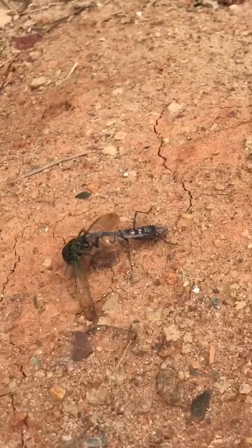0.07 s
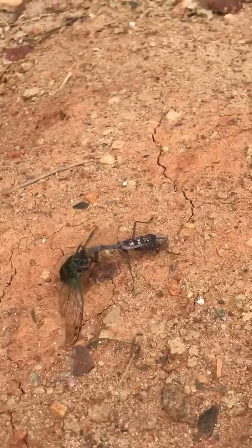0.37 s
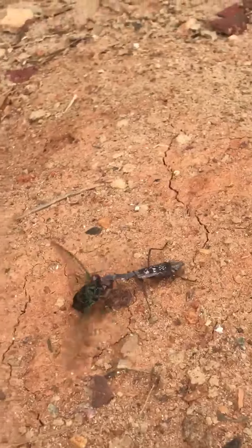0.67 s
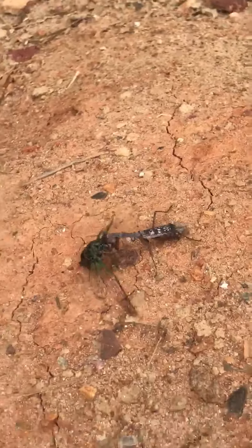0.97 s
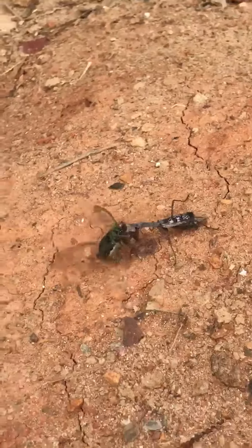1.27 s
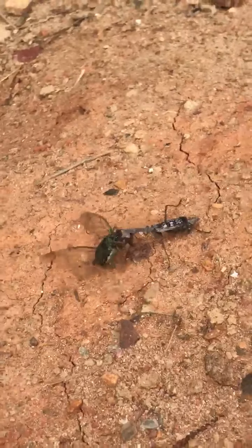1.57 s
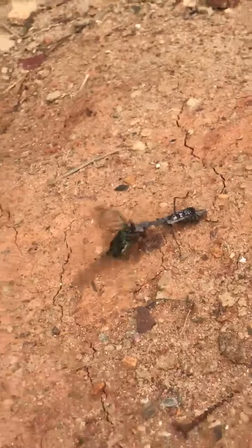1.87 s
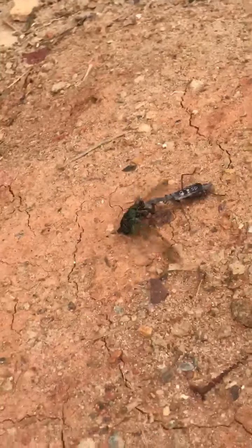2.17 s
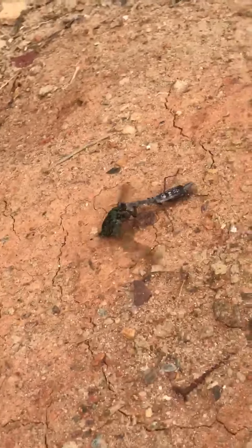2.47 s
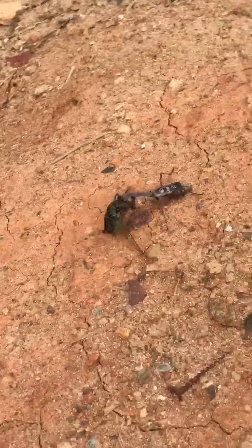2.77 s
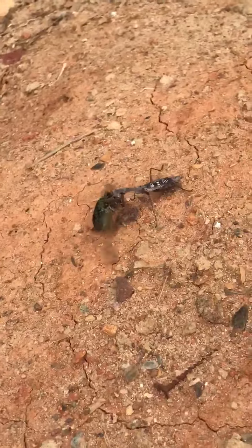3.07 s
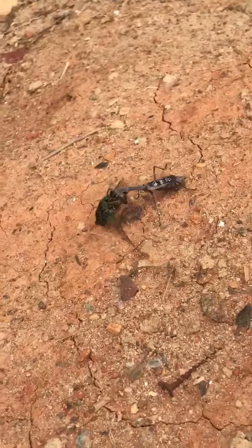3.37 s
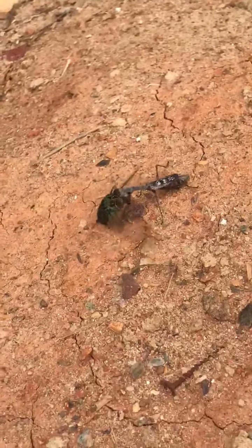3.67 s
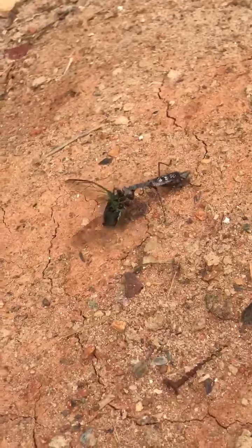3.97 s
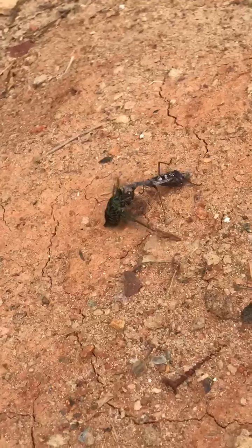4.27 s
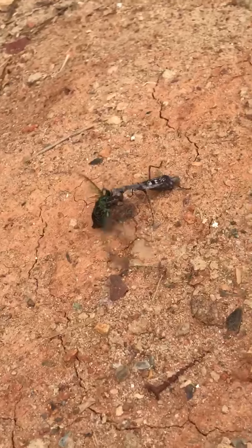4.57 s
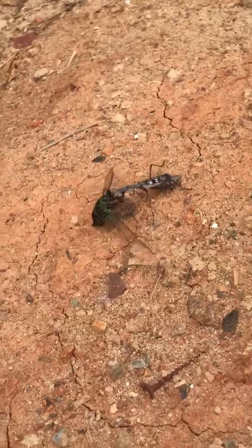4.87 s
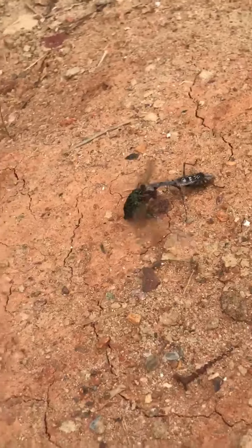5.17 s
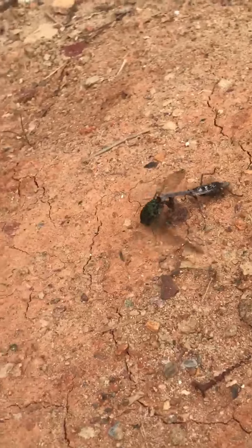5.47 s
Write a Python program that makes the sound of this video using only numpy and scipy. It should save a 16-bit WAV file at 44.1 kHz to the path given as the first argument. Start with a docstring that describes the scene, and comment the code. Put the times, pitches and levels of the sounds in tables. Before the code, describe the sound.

Outdoors, close to the ground, stiff insect wings rattle against sandy dirt in quick stop-and-start bursts from beginning to end. Low gusts hit the microphone and get stronger later. Behind this, a faint high insect chorus carries on steadily, and a distant hum fades after a second. Two far bird whistles and a sharp tap come early, and one more whistle near the end.

```python
"""Outdoors, a far insect chorus and a high pulsing trill sound throughout; a distant hum lasts a second.
From the start air buffets the microphone. Between two dry taps a cicada, pinned on dry soil, begins to
beat its wings in fits of about thirty strokes a second: each stroke crackles on the grit and rebounds,
and the wings drag in between. Then two far bird whistles and a louder tap pass. The fits go on while
the buffeting grows heavier, and a last bird whistles near the end."""
import sys
import numpy as np
from scipy import signal
from scipy.fft import rfft, irfft, next_fast_len
from scipy.io import wavfile
from scipy.ndimage import uniform_filter1d, map_coordinates

SR = 44100
rng = np.random.default_rng(int(sys.argv[2]) if len(sys.argv) > 2 else 0)


def digitize_waveform(pressure):
    """Quantize a signal to 16-bit integers and store it at the path in sys.argv[1].

    Rows of a 2-D input are taken as channels; values are limited to [-1, 1].
    """
    field = np.atleast_2d(pressure).T
    bounded = np.clip(field, -1, 1)
    quanta = np.round(bounded * 32767).astype(np.int16)
    wavfile.write(sys.argv[1], SR, quanta)


N = 248283
TIME = np.arange(N) / SR
CUTOFF_HZ = 15900


def from_db(db):
    """Decibels to gain."""
    return 10 ** (np.asarray(db) / 20)


def rms_one(x):
    """Scale to unit power."""
    return x / np.sqrt(np.mean(x ** 2) + 1e-20)


def colour(x, spectrum):
    """Minimum-phase EQ that keeps the power of white noise, so the curve sets only the tone."""
    size = 2 * next_fast_len(N // 2 + SR // 8)
    hz, db = np.transpose(spectrum)
    grid = np.maximum(np.arange(size // 2 + 1) * SR / size, 1)
    curve = from_db(np.interp(np.log(grid), np.log(hz), db))
    gain = rms_one(curve / np.sqrt(1 + (grid / CUTOFF_HZ) ** 40))
    cepstrum = irfft(np.log(gain))
    fold = 1 + np.sign(size // 2 - np.arange(size))   # folding the cepstrum makes the filter causal
    fold[0] = 1
    return irfft(rfft(x, size) * np.exp(rfft(cepstrum * fold)))[:N]


def drift(rate):
    """Smooth random modulation at unit power that changes `rate` times a second."""
    knots = rng.standard_normal(4096)
    return rms_one(map_coordinates(knots, [TIME * rate], order=2, mode="wrap"))


def narrow_noise(hz, width_hz):
    """Noise twice through one resonance, at unit power."""
    r = np.exp(-np.pi * width_hz / SR)
    section = [1 - r, 0, r - 1, 1, -2 * r * np.cos(2 * np.pi * hz / SR), r * r]
    return rms_one(signal.sosfilt([section, section], rng.standard_normal(N)))


def grit(per_s, spread_db):
    """Tiny collisions of uneven size at random moments, at unit power."""
    sizes = from_db(spread_db * np.minimum(rng.exponential(1, N), 3.5)) * rng.choice([-1, 1], N)
    return rms_one(sizes * (rng.random(N) < per_s / SR))


def contacts(times, levels_db, rise_s, fall_s):
    """Envelope of contacts with a fast attack and an exponential decay."""
    power = np.zeros(N)
    for s, db, rise, fall in np.broadcast(times, levels_db, rise_s, fall_s):
        near = slice(max(int(s * SR) - SR // 50, 0), int(s * SR) + SR // 12)
        t = TIME[near] - s
        power[near] += (from_db(db) * np.exp(np.where(t < 0, -(t / rise) ** 2, -t / fall))) ** 2
    return np.sqrt(power)


def far_tone(rows, waver_db, scatter_hz):
    """A distant tone, blurred and made to waver by the paths it takes."""
    times, *columns = np.transpose(rows)
    hz, level_db = [np.interp(TIME, times, column) for column in columns]
    gate = uniform_filter1d(1.0 * ((TIME >= times[0]) & (TIME <= times[-1])), size=SR // 80)
    phase = 2 * np.pi * np.cumsum(hz + scatter_hz * drift(150)) / SR
    return np.sqrt(2) * gate * from_db(level_db + waver_db * drift(40)) * np.sin(phase)


# EQ of the outdoor air bed: f/Hz, level/dB
AIR_EQ = [(25, -18), (50, 11), (100, 6.5), (250, -3), (500, -3.5), (750, -7), (980, -2.5), (1400, -13.5),
          (2200, -16), (3800, -17), (4900, -25.5), (9500, -17.5), (15500, -20.5)]
def still_air():
    """A quiet, dark bed of steady noise."""
    return from_db(-66.0) * colour(rng.standard_normal(N), AIR_EQ)


# Bands of the insect bed: f/Hz, width/Hz, level/dB
CHORUS_BANDS = [(5740, 180, -78), (6120, 600, -74.5), (6960, 320, -71), (7345, 160, -69.5),
                (9430, 370, -81)]
def insect_chorus():
    """Far insects blend into narrow bands of hiss that shimmer together."""
    bands = sum(from_db(db) * narrow_noise(hz, width) for hz, width, db in CHORUS_BANDS)
    return bands * from_db(2.0 * drift(25))


# EQ of the trill, all top end: f/Hz, level/dB
TRILL_EQ = [(7500, -30), (8700, -4), (9700, -1), (11000, 0), (15000, -2)]
def insect_trill(pulse_hz=51, sharpness=1.5):
    """One far insect sends quick, nearly even pulses of very high hiss."""
    phase = 2 * np.pi * np.cumsum(pulse_hz * (1 + .03 * drift(3.5))) / SR
    pulses = rms_one((1 + np.cos(phase)) ** sharpness)
    return from_db(-68.5) * colour(pulses * rng.standard_normal(N), TRILL_EQ)


# Pitch and level automation of the hum: t/s, f/Hz, level/dB
HUM_NOTE = [(0, 545, -68), (.28, 529, -74), (.36, 536, -79), (.5, 531.5, -69), (.9, 535, -69),
            (1.0, 530, -74)]
# EQ of the rush around it: f/Hz, level/dB
RUSH_EQ = [(200, 1), (550, 2.5), (900, -3.5), (2000, -7.5), (4500, -7), (9000, -16)]
def hum(end_s=1.014, fade_s=.04):
    """A distant note in a soft rush, perhaps a motor; both stop after a second."""
    running = (1 - np.tanh((TIME - end_s) / fade_s)) / 2
    rush = from_db(-65.5) * running * colour(rng.standard_normal(N), RUSH_EQ)
    return rush + from_db(-2.0) * far_tone(HUM_NOTE, waver_db=2.2, scatter_hz=2)


# Gust cues, timed at their crests: t/s, level/dB, half-length/s
GUSTS = [(0.015, -42.5, 0.026), (0.185, -47.5, 0.052), (0.378, -47.5, .11), (1.0, -54, 0.083),
         (1.264, -54.5, 0.032), (1.36, -51.5, 0.033), (1.487, -40, .05), (1.74, -49, .08),
         (1.97, -40.5, 0.023), (2.157, -52.5, 0.033), (2.554, -55, 0.06), (2.679, -41.5, 0.031),
         (2.8, -50.5, .06), (3.053, -48, 0.09), (3.291, -40.5, 0.09), (3.617, -45.5, 0.033),
         (3.803, -50, 0.027), (3.928, -46, 0.046), (4.11, -38.5, 0.043), (4.289, -43.5, 0.065),
         (4.484, -41.5, .1), (4.79, -43.5, .025), (4.935, -32, .06), (5.138, -54.5, 0.064),
         (5.359, -40.5, 0.056), (5.548, -37, 0.12)]
# EQ of the rumble on the microphone: f/Hz, level/dB
BUFFET_EQ = [(20, -40.5), (30, -11), (42, 0.5), (70, 3.5), (110, -5), (170, -12.5), (260, -24), (400, -34),
             (700, -63)]
# EQ of one small eddy: f/Hz, level/dB
EDDY_EQ = [(50, -19.5), (130, -1), (220, 1), (340, -6.5), (520, -20.5), (750, -29), (1500, -76.5)]
def wind(calm_db=-59, gust_shape=2.84):
    """Gusts buffet the microphone; stronger air sheds small eddies that land as soft thumps."""
    power = from_db(calm_db) ** 2
    for s, db, half in GUSTS:
        distance = np.minimum(np.abs(TIME - s) / half, 6)
        power += (from_db(db) * np.exp(-distance ** gust_shape / 2)) ** 2   # shape above 2: squarer
    flow_db = 10 * np.log10(power)
    swirl = colour(rng.standard_normal(N), BUFFET_EQ)
    swirl /= np.sqrt(uniform_filter1d(swirl ** 2, size=SR // 25) + 0.017)   # the flow sets the strength
    rumble = from_db(flow_db + 0.6 + 2.8 * np.tanh(drift(40))) * swirl
    eddy_gain = from_db(-43.5 + 1.524 * (flow_db + 36.0))
    return rumble + colour(eddy_gain * grit(per_s=70, spread_db=3.0), EDDY_EQ)


# Tap cues: t/s, level/dB
TAPS = [(0.071, -53), (0.3, -55.5), (2.0436, -40)]
# EQ of a tap's attack: f/Hz, level/dB
CRACK_EQ = [(500, -2.5), (1500, -3), (2800, -2), (4300, 0), (5500, -7), (7000, -10), (10000, -31)]
# Modes of its ring: f/Hz, level/dB, t60/s
TAP_MODES = [(324, -7.5, 0.089), (777, -11.5, 0.061), (1177, -8.5, 0.11), (1660, -7.5, 0.044),
             (2310, 0, 0.023), (2710, -7, 0.045), (3220, -5.5, 0.077), (3580, -0.5, 0.024),
             (3770, 0, 0.025), (4000, -3, .02), (4420, 2, 0.0094)]
def taps():
    """Dry knocks, as of small stones: a rough crack and a brief ring."""
    times, level_db = np.transpose(TAPS)
    crack = contacts(times + 0.00095, level_db, rise_s=0.00036, fall_s=0.0023) * rng.standard_normal(N)
    out = colour(crack, CRACK_EQ)
    blows = np.zeros(N)
    blows[np.round(times * SR).astype(int)] = from_db(level_db - 1.5)
    for hz, db, t60 in TAP_MODES:
        r, w = from_db(-60 / (t60 * SR)), 2 * np.pi * hz / SR
        ring = signal.lfilter([0, np.sin(w)], [1, -2 * r * np.cos(w), r * r], blows + 1e-18)
        out += rng.choice([-1, 1]) * from_db(db) * ring
    return out


# Fits of wingbeats: first t/s, last t/s, strokes, crackle level/dB, its change over the fit/dB,
# slap level/dB, rebound re stroke/dB, drag level/dB, quickening (below 0 slows)
FITS = [(.115, .215, 4, -39, -5.5, -50.5, -6, -55, 0), (.3185, .415, 4, -35.5, 3, -48, -9, -60, .02),
        (0.5278, .59, 3, -37, -12, -48.5, -14, -52, 0), (.626, .626, 1, -37.5, 0, -49, -7, -63, 0),
        (0.7624, .8583, 3, -37.5, -4, -48.5, -9, -58, .13), (0.9792, 1.051, 3, -41, -2, -48, -8.5, -64, 0),
        (1.1717, 1.2634, 4, -41.5, 0, -47.5, -11.5, -61, 0.24),
        (1.3782, 1.489, 5, -43, 1, -50, -12, -57, 0.0099),
        (1.6488, 1.7644, 5, -44, -0.5, -48.5, -12, -58.5, -0.0097),
        (1.9738, 2.0885, 5, -43.5, 1.5, -49.5, -9, -68, 0.043),
        (2.2912, 2.3811, 4, -44.5, 2, -50.5, -9.5, -56, 0.14),
        (2.5089, 2.609, 5, -45, 1, -50.5, -8, -56.5, -.05),
        (2.6366, 2.7968, 7, -38, -3, -51, -17, -57.5, .01),
        (2.826, 2.878, 3, -50.5, -3, -54.5, -12, -59.5, .1),
        (2.9761, 3.0642, 2, -42.5, -5, -50.5, -14, -60, 0),
        (3.137, 3.1363, 1, -39.5, 0, -54.5, -30, -62, 0), (3.1684, 3.1684, 1, -46, 0, -47, -30, -61, 0),
        (3.198, 3.3149, 5, -46, 11.5, -52.5, -22, -58, 0.058),
        (3.343, 3.428, 4, -54, 0, -57, -15, -58.5, -0.12), (3.5484, 3.571, 2, -41, 1, -49, -28, -62, 0),
        (3.6468, 3.6465, 1, -42.5, 2, -46, -15, -63, 0),
        (3.7605, 3.8275, 3, -38.5, 0, -47.5, -23, -59.5, 0.27),
        (3.8805, 3.8808, 1, -39, 1, -46.5, -22, -58, 0), (3.9903, 4.0412, 3, -37.5, 0.5, -47, -11, -64, .8),
        (4.08, 4.11, 2, -40, 5, -46, -16, -61, 0), (4.226, 4.2256, 1, -38.5, 0, -46, -18, -64, 0),
        (4.264, 4.3498, 4, -44.5, 6, -52, -18, -58.5, 0.11),
        (4.4397, 4.4634, 2, -42.5, 7.5, -51.5, -16, -56, 0), (4.5142, 4.553, 2, -36, 2.5, -44, -23, -63, 0),
        (4.6472, 4.7141, 3, -38, -2, -45, -19, -61.5, .3), (4.7536, 4.788, 2, -37.5, 3, -42.5, -26, -63, 0),
        (4.8885, 4.9258, 2, -40, -5, -45.5, -23, -66, 0), (4.9791, 4.9791, 1, -38, 2, -46, -19, -66, 0),
        (5.089, 5.1515, 3, -41.5, -2, -46.5, -14, -65, .36),
        (5.2287, 5.2287, 1, -42.5, 0, -54, -28, -66, 0), (5.2616, 5.3, 2, -38.5, .5, -46.5, -14, -64, 0),
        (5.327, 5.3797, 2, -39.5, 5, -48.5, -18, -64, 0),
        (5.5008, 5.6151, 5, -39, 5, -46, -9, -63.5, -0.065)]
def drag_pressure(legs_db=-67, graze_db=-60, graze_lead_s=0.029, attack_s=.004, release_s=0.027):
    """How hard the cicada leans on the soil: a wing tip's graze before each fit, a hold, a release."""
    pressure = np.full(N, from_db(legs_db))
    for first, last, *_, drag_db, _ in FITS:
        near = slice(max(int((first - .1) * SR), 0), int((last + .25) * SR))
        t = TIME[near]
        graze = from_db(graze_db) * np.exp(-((t - first + graze_lead_s) / 0.0095) ** 2)
        outside = np.maximum(first - t, 0) / attack_s + np.maximum(t - last, 0) / release_s
        hold = from_db(drag_db) * np.exp(-outside ** 2)
        pressure[near] = np.maximum.reduce([pressure[near], hold, graze])
    return pressure


def strokes(slap_follows=.22):
    """Spread each fit into single beats: t/s, crackle level/dB, slap level/dB, rebound/dB."""
    rows = []
    for first, last, beats, crackle_db, change_db, slap_db, rebound_db, _, quickening in FITS:
        for progress in np.linspace(0, 1, beats):
            s = first + (last - first) * (progress + quickening * progress * (1 - progress))
            effort_db = change_db * (progress - .5)
            opening = progress == 0   # the first stroke lands flattest and gets an accent
            rows.append((s, crackle_db + effort_db + .2 * opening,
                         slap_db + slap_follows * effort_db + 1.3 * opening, rebound_db))
    return np.array(rows)


# EQ of the wing membrane's bright crackle, dragged or struck: f/Hz, level/dB
CRACKLE_EQ = [(3500, -22), (5200, -6.5), (6500, -4.5), (8200, -2), (9800, 1), (11000, -1), (12500, 2.5),
              (15500, 1.5)]
# EQ of coarse grit under a dragged wing: f/Hz, level/dB
RUSTLE_EQ = [(500, -12), (1300, 0), (2200, -6), (3400, 0), (4400, -2), (5500, -5), (7500, -14.5)]
def wing_drag():
    """In a fit the wings scrape up short clumps of grains; between fits the legs barely stir the soil."""
    scrape = drag_pressure() * rms_one(from_db(4.56 * drift(200)))
    fine = scrape * grit(per_s=9000, spread_db=7.0)
    coarse = scrape * grit(per_s=6000, spread_db=5.5)
    coarse *= from_db(2.0 * drift(120))   # larger grains roll in their own clumps
    return from_db(-1.6) * colour(fine, CRACKLE_EQ) + from_db(-7.5) * colour(coarse, RUSTLE_EQ)


def wing_force(times, skid, levels_db, rebound_db, delays, rise_s, fall_s, rebound_fall_s):
    """The tip brushes the soil, the stroke lands, the membrane touches down again."""
    brush = contacts(times - .003, levels_db - 18.5, rise_s, fall_s)
    landing = contacts(times, levels_db + 0.5, rise_s * skid, fall_s * skid)
    rebound = contacts(times + delays, levels_db + rebound_db, rise_s, rebound_fall_s)
    return np.sqrt(brush ** 2 + landing ** 2 + rebound ** 2)


# EQ of the slap, the body of each stroke: f/Hz, level/dB
SLAP_EQ = [(400, -10.5), (800, 1), (1400, -1), (2200, -1.5), (3400, 4), (4400, 2.5), (5500, -3.5),
           (7500, 1.5)]
def wingbeats():
    """Stiff membranes skid over sand grains: a bright crackle with a hollower slap below it."""
    times, crackle_db, slap_db, rebound_db = strokes().T
    delays = rng.uniform(.005, .0095, len(times))
    rebound_db = rebound_db + 1.5 * rng.standard_normal(len(times))
    skid = from_db(0.2 * (crackle_db - np.mean(crackle_db)))   # harder strokes skid for longer
    treble = wing_force(times, skid, crackle_db, rebound_db + .5, delays,
                        rise_s=0.00093, fall_s=0.0024, rebound_fall_s=0.0028)
    body = wing_force(times, skid, slap_db, rebound_db + 1.3, delays,
                      rise_s=0.0017, fall_s=0.0041, rebound_fall_s=0.0091)
    catching = from_db(1.64 * drift(900))   # the wing veins catch and slip
    crackle = colour(treble * catching * grit(per_s=15000, spread_db=4.2), CRACKLE_EQ)
    slap = colour(body * catching * grit(per_s=12000, spread_db=2.0), SLAP_EQ)
    return from_db(-2.0) * crackle + slap


def eddy(s, db, hz, phase, order=4):
    """One short push and pull of pressure, steep in the middle and slack at both ends."""
    out = np.zeros(N)
    near = slice(max(int(s * SR) - SR // 20, 0), int(s * SR) + SR // 20)
    angle = 2 * np.pi * hz * (TIME[near] - s)
    out[near] = from_db(db) * np.real(np.exp(1j * phase) / (1 - 1j * angle / order) ** (order + 1))
    return out


# Cues for the big wind thumps: t/s, level/dB, f/Hz
PUFFS = [(.166, -37.5, 109), (.222, -35.5, 70), (.338, -34.5, 72), (.45, -31.5, 59.5), (.963, -42, 90),
         (1.096, -40, 69), (1.179, -37, 85), (1.307, -43, 110), (1.363, -40, 130), (1.416, -34.5, 132),
         (1.488, -29.5, 110), (1.518, -25, 100), (1.61, -39, 109), (1.675, -30.5, 117), (1.741, -32, 120),
         (1.793, -29, 160), (2.662, -35, 175), (2.732, -35, 68), (2.842, -39.5, 130.2), (2.978, -38.5, 156),
         (3.084, -31.5, 105), (3.161, -30.5, 80.4), (3.254, -31, 99), (3.328, -26.5, 82), (3.507, -36, 68),
         (3.605, -38, 121), (3.904, -39.5, 174), (4.09, -28, 142), (4.158, -27.5, 60), (4.225, -20, 205),
         (4.297, -30.5, 94), (4.406, -29.5, 70), (4.442, -21, 110), (4.451, -25, 84), (4.519, -23.5, 162),
         (4.539, -31, 271), (4.589, -29, 60), (4.872, -24, 80), (4.897, -23.5, 160), (4.921, -22, 185),
         (4.944, -27, 230), (4.959, -24, 140), (4.976, -21, 110), (5.0, -25, 75), (5.31, -33.5, 185),
         (5.348, -32.5, 183), (5.404, -25, 83), (5.479, -24.5, 70.6), (5.597, -23.5, 194)]
def puffs(wake_above_hz=125, wake_delay_s=.009, wake_hz=72):
    """Large eddies thump on the microphone; the quick ones draw a slow wake behind them."""
    out = np.zeros(N)
    for s, db, hz in PUFFS:
        phase, wake_phase = rng.uniform(0, 2 * np.pi, 2)
        out += eddy(s, db, hz, phase)
        if hz > wake_above_hz:
            out += eddy(s + wake_delay_s, db - 7, wake_hz, wake_phase)
    port = signal.butter(6, 850, fs=SR, output="sos")   # the mic port averages out the smallest eddies
    return from_db(1.7) * signal.sosfilt(port, out)


# Bird glides, one list a whistle: t/s, f/Hz, level/dB
WHISTLES = [
    [(1.305, 5200, -70), (1.32, 5070, -59.5), (1.345, 3580, -69), (1.37, 3230, -67), (1.44, 3300, -72)],
    [(1.95, 3300, -75), (2.07, 3500, -71), (2.13, 3730, -69), (2.25, 3960, -78)],
    [(5.25, 5250, -66), (5.275, 4630, -65), (5.305, 3380, -71), (5.35, 3250, -67), (5.45, 3270, -76)],
]
def birds():
    """Three far whistles: one falls, one rises, one falls."""
    return from_db(-3.0) * sum(far_tone(rows, waver_db=2, scatter_hz=100) for rows in WHISTLES)


def scene():
    """The mono mix at one microphone held over the ground."""
    bed = still_air() + insect_chorus() + insect_trill() + hum()
    return (bed + wind() + taps() + wing_drag() + wingbeats() + puffs() + birds())[None]


def record(dry):
    """A low cut drops the deepest rumble and a steep high cut trims the top."""
    thinned = signal.sosfilt(signal.butter(4, 32, "high", fs=SR, output="sos"), dry)
    return signal.sosfilt(signal.ellip(10, .2, 70, CUTOFF_HZ, fs=SR, output="sos"), thinned)


dry = scene()
out = record(dry)
digitize_waveform(out)
```